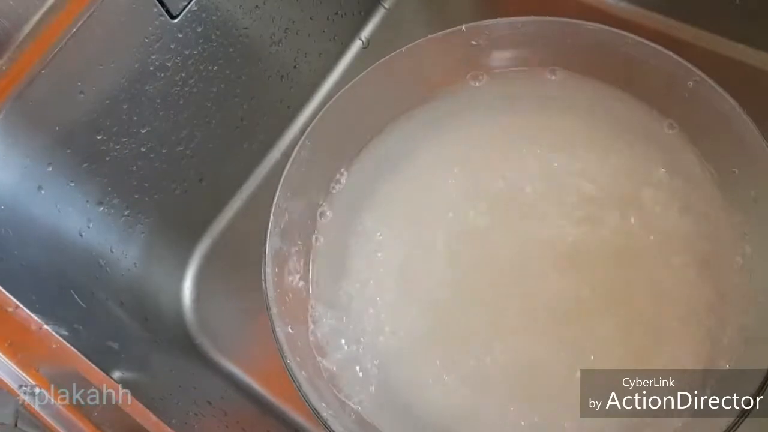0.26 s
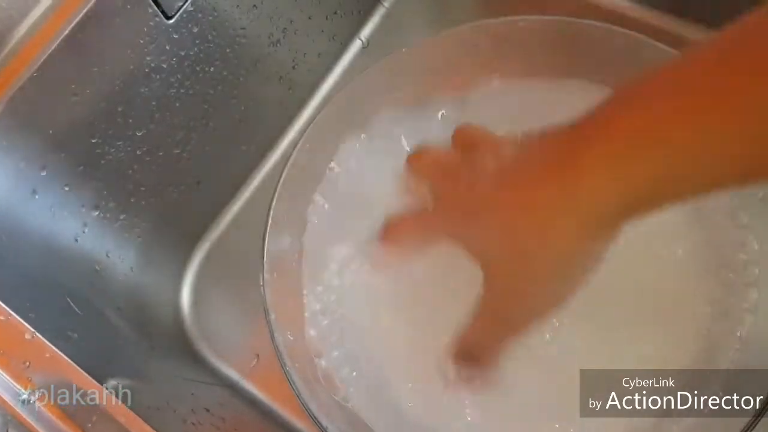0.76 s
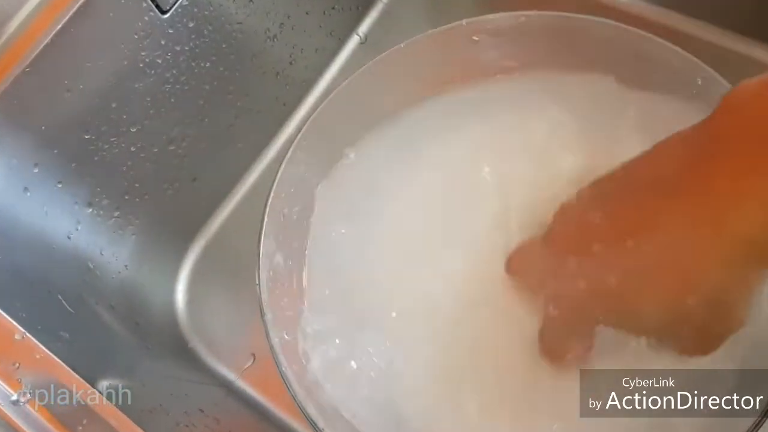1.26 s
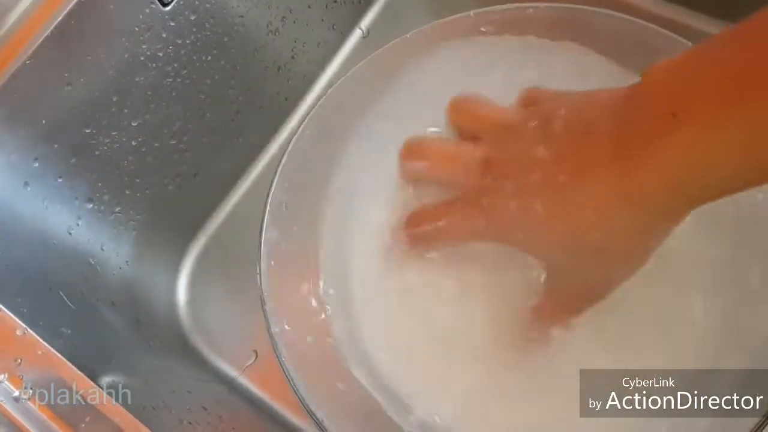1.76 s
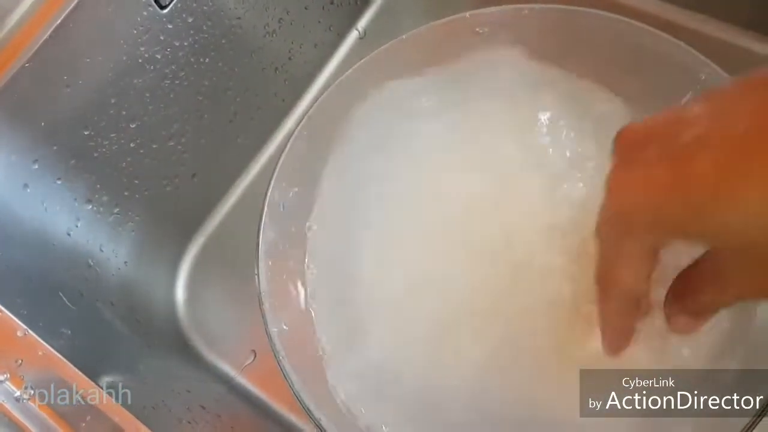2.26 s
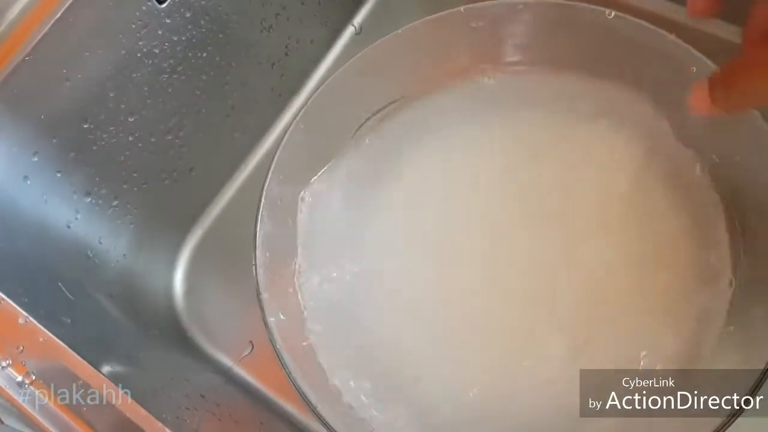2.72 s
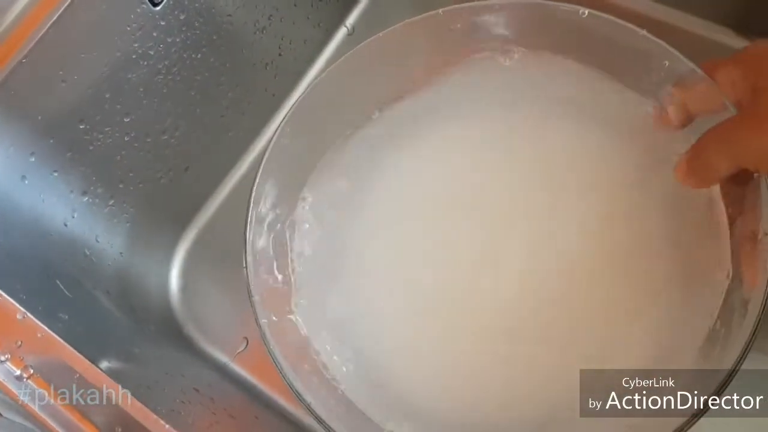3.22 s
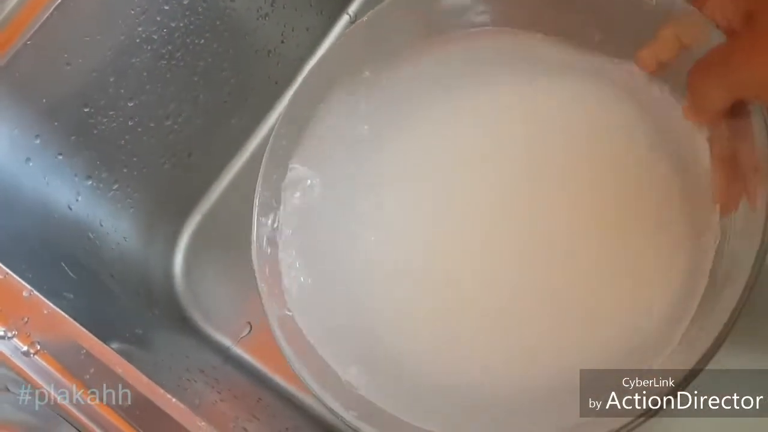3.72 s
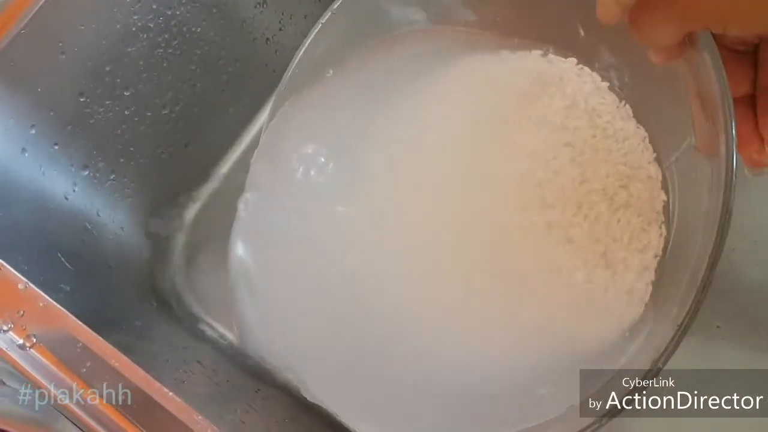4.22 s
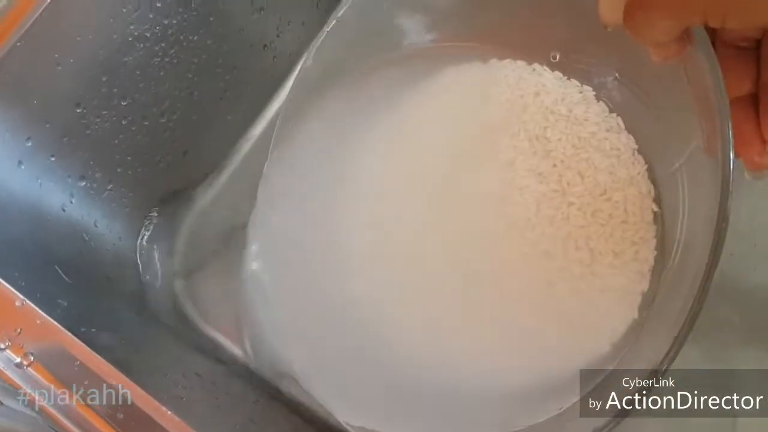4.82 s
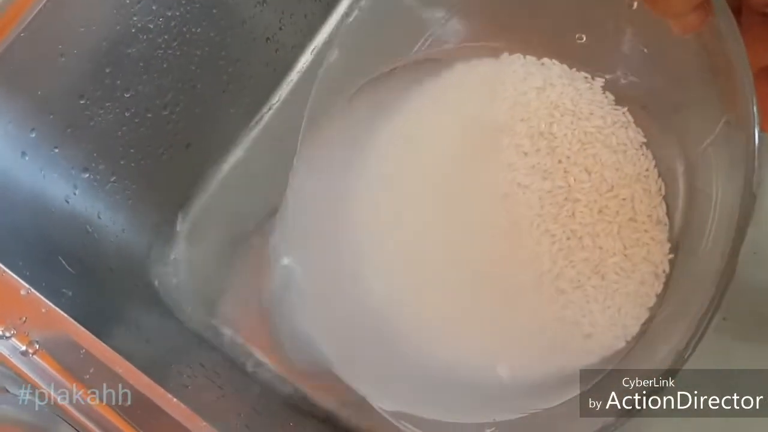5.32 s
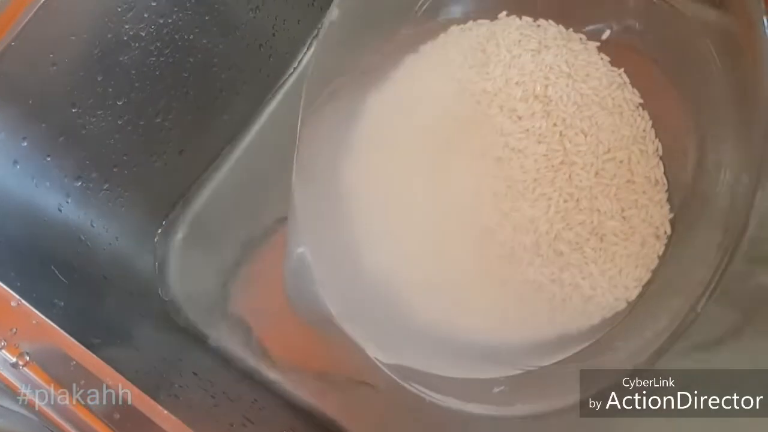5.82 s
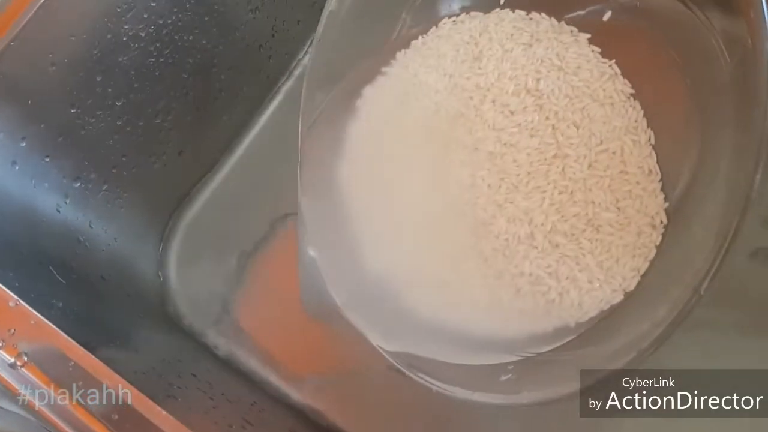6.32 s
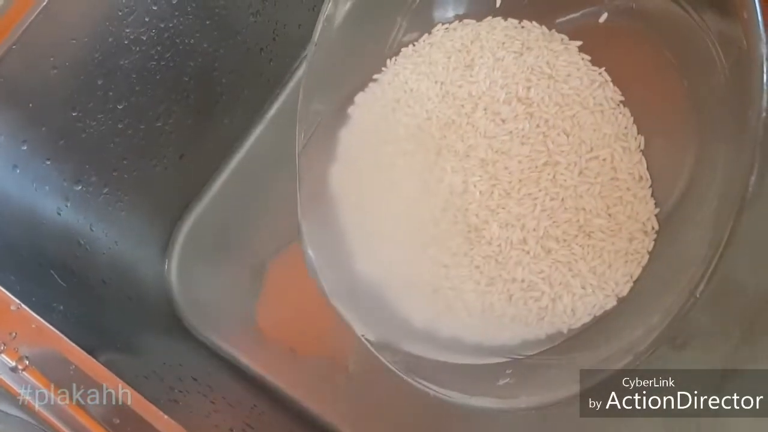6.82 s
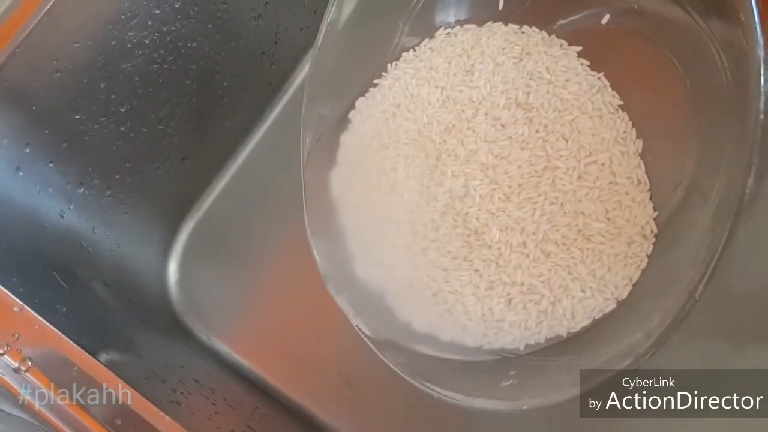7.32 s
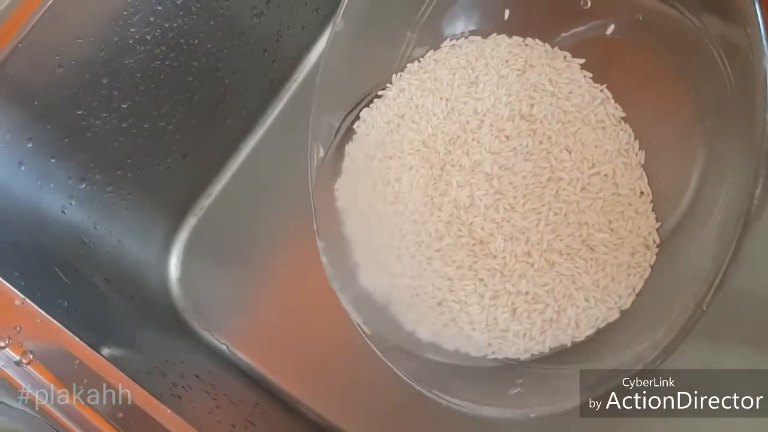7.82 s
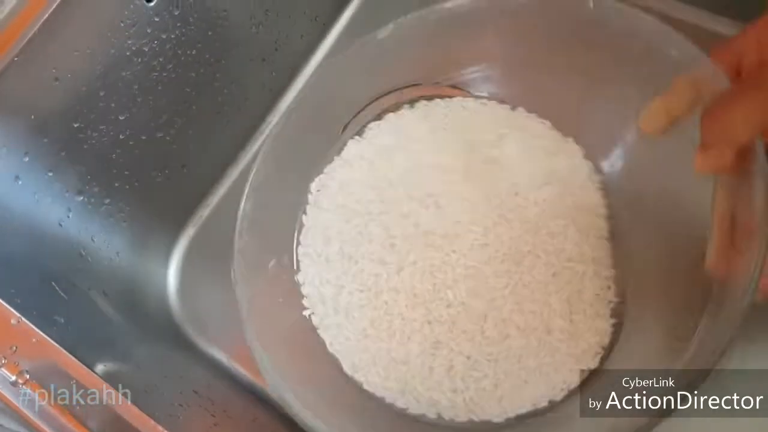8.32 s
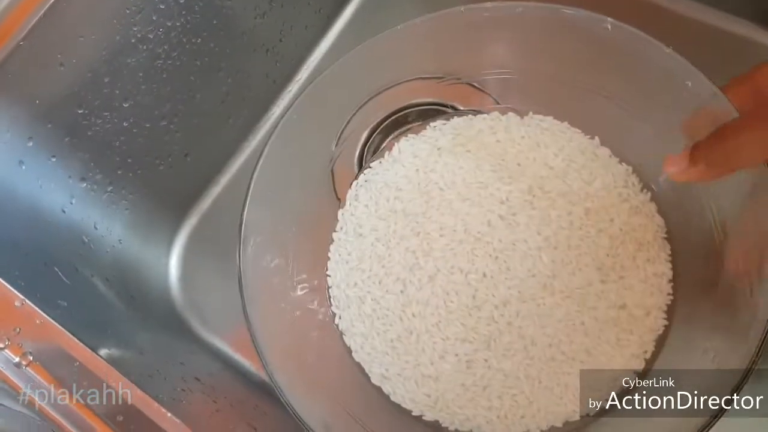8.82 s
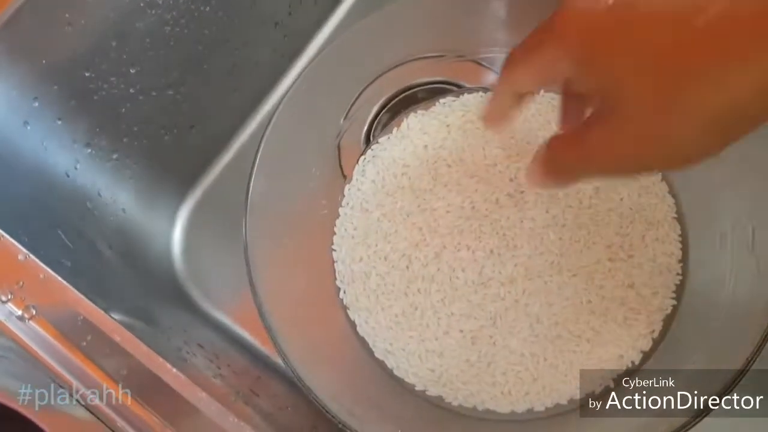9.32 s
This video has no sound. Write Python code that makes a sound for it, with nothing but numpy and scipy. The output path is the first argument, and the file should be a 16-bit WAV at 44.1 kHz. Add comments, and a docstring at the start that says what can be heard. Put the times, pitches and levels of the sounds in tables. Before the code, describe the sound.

Close stereo sound at a kitchen sink: tap water cuts off, then rice and water are swished very gently by hand, with low muffled thuds of steel. Midway, cloudy water is poured out, splashing brightly and then trickling with deep glugs from the drain. The glass bowl lands with a loud hollow thump, bounces and rattles, and settles into small wet sounds over faint room hum.

```python
"""The last of the tap splashes into a glass bowl of rice, then a hand stirs softly in a steel sink.
The bowl is tipped: water splashes on the steel and gurgles down the drain; a thump and bounces follow.
Water is made of random bubbles and noise, drops of short notes with hiss, steel and glass of fading
sines. The sink bottom drones and a quiet kitchen hums behind, all heard by a close two-port microphone."""
import sys
import numpy as np
from scipy import signal
from scipy.fft import rfft, irfft, next_fast_len
from scipy.io import wavfile
from scipy.ndimage import uniform_filter1d, map_coordinates

SR = 44100
rng = np.random.default_rng(int(sys.argv[2]) if len(sys.argv) > 2 else 0)


def wrap_up_sound(samples):
    """Save the sound to the file named by the first command line argument, as 16-bit audio."""
    columns = np.atleast_2d(samples).T
    # keep every value between -1 and 1, then stretch to whole-number steps
    tamed = np.clip(columns, -1, 1)
    steps = np.round(tamed * 32767).astype(np.int16)
    wavfile.write(sys.argv[1], SR, steps)


N = 421596
TIME = np.arange(N) / SR  # s

# Last of the tap, foam settling, then the pour: [t/s, slosh level/dB, trickle level/dB, fizz level/dB]
WATER_FLOW = [(0, -37, -38.5, -38.5), (.12, -59, -50, -45), (.17, -57, -52, -56), (.2, -68, -63, -52.5),
              (.35, -78.5, -90, -53), (.85, -72.5, -71, -56), (1.05, -76.5, -75, -61.5),
              (3.1, -83, -80, -68), (3.45, -79, -97, -72.5), (4.12, -80, -83, -71), (4.18, -59.5, -65, -59),
              (4.46, -57.5, -52.5, -50), (4.63, -45.5, -39, -38.5), (4.8, -47.5, -38.5, -43),
              (5.08, -56, -47, -48.5), (5.22, -47, -48.5, -44), (5.44, -58, -49.5, -56),
              (6.17, -61.5, -51, -54.5), (6.4, -55, -54.5, -60), (6.9, -61.5, -52.5, -59.5),
              (7.08, -53, -51, -54.5), (7.36, -67, -56.5, -60), (8.05, -61.5, -55, -60),
              (8.78, -56, -62.5, -74), (9.05, -71, -75.5, -76), (9.56, -64.5, -98, -103)]
# The hand sweeps through, the water sways:
# [peak t/s, length/s, slosh level/dB, trickle level/dB, fizz level/dB]
HAND_SWEEPS = [(.62, 0.45, -79, -74, -54.5), (.96, 0.16, -67.5, -68, -74), (1.56, 0.18, -90, -57.5, -64),
               (1.82, .12, -62, -64, -65), (2.1, 0.13, -77, -62.5, -79), (2.25, 0.18, -84, -72, -61),
               (2.47, 0.21, -75, -65, -62), (2.75, 0.092, -63, -79, -69), (2.99, 0.14, -62.5, -81, -78),
               (3.23, 0.094, -54, -59.5, -61), (3.69, 0.22, -55, -61.5, -58),
               (3.85, 0.16, -54.5, -61.5, -60.5), (9.53, 0.28, -71, -63, -57)]
# Tone colour of the low, middle and high water noise: [f/Hz, level/dB]
SLOSH_COLOUR = [(150, -45), (250, -3), (307, 3), (563, 0.5), (645, -6), (1100, -9), (1430, -19.5),
                (2420, -120)]
TRICKLE_COLOUR = [(470, -37), (800, -6.5), (1010, -18), (1090, -6.5), (1340, -3.5), (1560, -5.5),
                  (2430, -4.5), (4200, -13.5), (5460, -53), (9240, -120)]
FIZZ_COLOUR = [(2060, -15.5), (3500, -5.5), (5050, -1), (7300, -2), (8040, 2.5), (11900, -3.5), (15000, -1),
               (15800, -20.5), (16300, -38)]
TAP_OFF_S, POUR_S, POUR_END_S = 0.25, 4.15, 8.07
SLAPS_FALLING, SLAPS_STIRRED = .95, .25  # share of the flow that comes in slaps


def water():
    """Three sizes of bubble lie on noise; falling water breaks into slaps, stirred water hisses more evenly."""
    slosh_gain, trickle_gain, fizz_gain = swells(HAND_SWEEPS, curves(WATER_FLOW))
    falling = (TIME < TAP_OFF_S) | ((TIME > POUR_S) & (TIME < POUR_END_S))
    broken = uniform_filter1d(np.where(falling, SLAPS_FALLING, SLAPS_STIRRED), size=SR // 16)
    shared = spurts(rate=20, t60=0.048, spread_db=0.0)

    def flow(even, own):
        """Mixes an even stream with slaps, some shared by all layers and some of its own."""
        return 1 - broken + broken * unit(even + .6 * shared + own)

    def deep(hz):
        """Share of large cavities, which are struck at other moments than small ones."""
        return 1 / (1 + (hz / 2000) ** 4)

    large = flow(.4, spurts(rate=22, t60=0.13, spread_db=4.0)) * pair(TRICKLE_COLOUR)
    small = flow(0.12, spurts(rate=27, t60=0.06, spread_db=8.0)) * pair(TRICKLE_COLOUR)
    bed = filtered(large, lambda hz: np.sqrt(deep(hz)))
    bed += filtered(small, lambda hz: np.sqrt(1 - deep(hz)))

    slosh = 0.69 * broken * bubbles(
        count=900, centre_hz=515, octaves=.5, cycles=17.4, spread_db=7, size=2400)
    slosh += 0.76 * flow(0.16, spurts(rate=28, t60=0.03, spread_db=3.5)) * pair(SLOSH_COLOUR)
    trickle = .7 * broken * bubbles(
        count=2400, centre_hz=1918, octaves=0.719, cycles=36.5, spread_db=9.0, size=1500)
    trickle += .72 * bed
    fizz = 0.57 * broken * bubbles(
        count=3500, centre_hz=8520, octaves=.65, cycles=48, spread_db=4.5, size=600)
    fizz += 0.67 * flow(0.44, spurts(rate=48, t60=0.1, spread_db=7)) * pair(FIZZ_COLOUR)
    return slosh_gain * slosh + trickle_gain * trickle + fizz_gain * fizz


# Drops and splashes: [t/s, level/dB, bubble f/Hz, spray f/Hz, spray level/dB, left-right level/dB]
DROPS = [(.0516, -26, 1330, 4270, -13, 3), (0.069, -23.5, 1430, 4500, -1.5, 1),
         (0.0992, -24, 1524, 4440, 5, -2), (.117, -26, 1000, 1500, -9, 3),
         (0.15, -32.5, 1620, 2200, -16, -14), (.166, -33, 3270, 1600, -9, 3),
         (.2015, -59, 6160, 12700, 16, -11), (0.227, -44, 2060, 2050, -20, 10),
         (0.9327, -46.5, 2130, 4190, -4, 17), (1.2747, -48.5, 3910, 4140, 7, 3),
         (1.469, -29, 4950, 4970, -10, -3), (1.713, -47.5, 3050, 1910, -3, -15),
         (1.7574, -51, 6500, 11400, 7, -2.5), (1.809, -47, 1700, 3850, 2, 0),
         (1.827, -43.5, 1580, 8390, -21, -3), (2.2592, -41, 7130, 7350, -8, -3),
         (2.361, -41.5, 7100, 7700, 0.5, -10.5), (2.43, -44, 7640, 7730, -20, -19.5),
         (2.448, -40, 1395, 8100, -0.5, 12), (4.155, -49, 1100, 11200, 5, 0),
         (4.2297, -29.5, 2100, 6000, 1, -1), (4.3197, -33.5, 2480, 9800, -2, 1),
         (4.3426, -35, 4930, 4730, 7.5, -3), (4.4306, -16, 2550, 2970, 1.5, -7.5),
         (4.4712, -36, 2940, 2990, -22, -23), (4.483, -24, 1380, 2800, -21, 2),
         (4.511, -36, 1640, 2690, -15, 2), (4.525, -34, 2480, 4080, -18, -19),
         (4.5983, -22.5, 1360, 3520, -7, -9), (4.6198, -19, 1210, 2790, -19, 7),
         (4.643, -25, 1330, 3000, 3, 4), (4.66, -20.5, 1170, 2800, -10, 2),
         (4.6871, -16, 1324, 2820, -13, 2), (4.7753, -23, 1210, 2830, -19, 8),
         (4.8254, -19.5, 2140, 3100, -0.5, -3.5), (4.849, -18.5, 2420, 4500, -5, 3),
         (4.8958, -29.5, 1200, 6500, 9.5, -5), (4.945, -26, 2006, 4170, -1, 4),
         (5.035, -28, 1250, 2980, 0, 18), (5.118, -28.5, 1340, 5730, -28, 0),
         (5.1349, -28.5, 5040, 4540, 9, 0), (5.184, -30.5, 4450, 4520, -1, 6),
         (5.216, -25, 1680, 3140, -14, 1), (5.231, -30.5, 8640, 8700, 2, -12),
         (5.2777, -38, 2490, 4700, 6, -2), (5.501, -39, 1280, 11800, 4, 1),
         (5.532, -37, 3460, 3480, -10, -13), (5.618, -28.5, 1290, 2700, -12, -2),
         (5.6405, -27, 1810, 2650, 2, -.5), (5.704, -36, 1360, 2830, -23, 5),
         (5.7483, -33.5, 1180, 5040, -7, 4), (5.9022, -41, 2690, 2620, -29, -27),
         (6.0202, -39, 970, 3850, -15, 4), (6.055, -33, 1026, 2600, -8, 3),
         (6.107, -34.5, 2690, 2700, 1, -2), (6.141, -37.5, 1320, 8040, 5, -5),
         (6.2053, -32, 8940, 9740, -20, 2), (6.5618, -24.5, 936, 2640, -8, 1),
         (6.614, -36.5, 1030, 2500, -16, 3), (6.663, -37, 880, 3340, -25, -1),
         (6.68, -31, 844, 3300, -20, 2), (6.7497, -34.5, 2360, 2610, -19, 1),
         (6.9124, -38, 1020, 12100, -0.5, -.5), (6.992, -30, 1260, 2800, -7, 11),
         (7.062, -28, 3550, 3720, -1, 2), (7.21, -33, 1210, 3600, -24, 4),
         (7.538, -40, 5570, 5590, -25, -10), (7.7366, -32, 1820, 3300, -18, -4),
         (8.796, -43, 1490, 2760, -25, -8), (8.9288, -40.5, 1220, 4470, -4.5, 3),
         (9.039, -53.5, 1390, 8700, 2, -3), (9.128, -53, 1200, 2500, -15, 2),
         (9.4701, -36, 8040, 8160, -24, -12)]
# Large air pockets in bowl and drain: [t/s, level/dB, f/Hz]
AIR_POCKETS = [(.097, -30.5, 850), (3.763, -38, 220), (4.151, -38.5, 353), (4.481, -36, 485),
               (4.614, -29.5, 780), (4.665, -28, 407), (4.775, -31.5, 453), (4.838, -36, 430),
               (4.903, -33, 740), (4.941, -28.5, 793), (5.193, -31, 730), (5.594, -23, 160),
               (5.632, -25, 199), (5.702, -29, 197), (6.341, -26.5, 540), (6.371, -30, 547),
               (6.397, -31, 547), (6.428, -42, 544), (6.475, -30, 220), (6.659, -30.5, 207),
               (6.772, -26.5, 176), (6.829, -29.5, 166), (6.927, -38, 253), (7.109, -24.5, 213),
               (7.222, -27.5, 208), (7.27, -30.5, 163), (7.387, -31, 217), (7.467, -25, 160),
               (7.606, -33, 171), (7.732, -30, 187), (7.868, -20, 158), (7.915, -26, 167)]
DRIBBLE_S, DRIBBLE_DB, DRIBBLE_HZ = 4.8, -50.5, 1890  # start, middle level and pitch of random small drops
GULP_T60_S, GULP_SMALL_HZ = 0.077, 900  # ring of a very large pocket; halved at this pitch


def splashes():
    """Each drop snaps, throws spray and leaves a short rough note; larger air pockets gulp."""
    out, t = np.zeros((2, N)), TIME[:SR // 6]

    def band(hz, width, x):
        """Keeps the sound around one pitch."""
        edges = [hz / width, min(hz * width, 20000)]
        return signal.lfilter(*signal.butter(1, edges, "band", fs=SR), x)

    fade = amp(-60 * t / 0.031) * (1 - np.exp(-t / 0.0009))
    dribble = [(rng.uniform(DRIBBLE_S, POUR_END_S), DRIBBLE_DB + 1.8 * a, DRIBBLE_HZ * 2 ** (.4 * b),
                3300 * 2 ** (0.59 * c), -4 + 5 * d, 8 * e)
               for a, b, c, d, e in rng.standard_normal((30, 5))]
    for s, db, hz, spray_hz, spray_db, pan in DROPS + dribble:
        hiss = rng.standard_normal((3, len(t)))
        snap = 0.62 * band(hz, 1.65, hiss[0])
        mist = band(10000 * 2 ** rng.uniform(-0.076, 0.42), 1.03, hiss[2])
        spray = amp(spray_db) * (1.6 * band(spray_hz, 1.12, hiss[1]) + 0.32 * mist)
        rough = 1 + 0.26 * np.cos(2 * np.pi * hz * rng.uniform(0.035, .12) * t)
        note = bubble(hz, 0.031, 0.023, len(t), 0.8) * rough
        gain = amp(db + np.array([[pan / 2], [-pan / 2]]))
        add(out, s, gain * (0.72 * note + fade * (snap + spray)))
    for s, db, hz in AIR_POCKETS:
        t60 = GULP_T60_S / (1 + hz / GULP_SMALL_HZ)
        add(out, s, amp(db) * bubble(hz, t60, 0.063, len(t), 1.0)[None])
    return out


# The bowl is set down and bounces: [t/s, level/dB, boom level/dB, clatter level/dB, crack level/dB, rattle t60/s]
KNOCKS = [(8.076, -1, -10.5, -24.5, -48, 0.19), (8.117, -12.5, -21, -12, -16.5, 0.23),
          (8.255, -11.5, -7.5, -16.5, -44, 0.18), (8.329, -18.5, -19, -19.5, -41, 0.6),
          (8.399, -28.5, -17, -14.5, -33, 1), (8.533, -14.5, -16, -14, -39, 0.076),
          (8.6525, -25, -14, 7, 8, 0.26), (8.688, -23, -11, -18, -34, 0.17)]
# Tones of the sink bottom: [f/Hz, level/dB, t60/s]
SINK_TONES = [(53.6, 6, 0.27), (111.4, 2.5, 0.12), (135.3, -4.5, 0.14), (179.8, -13, 0.3),
              (238, -5.5, 0.084), (329, -13, 0.1), (472, -14.5, 0.091), (612, -16.5, 0.062),
              (715, -9.5, 0.04)]


def thumps():
    """The bowl's foot drives the sink bottom down; rice and drain plate clatter and rattle on."""
    out, t = np.zeros((2, N)), TIME[:SR // 2]
    low = signal.butter(1, [60, 450], "band", fs=SR)
    mid = signal.butter(1, [400, 1500], "band", fs=SR)
    high = signal.butter(2, 2500, "high", fs=SR)
    for s, db, boom_db, clatter_db, crack_db, rattle in KNOCKS:
        level_db = np.array([g for _, g, _ in SINK_TONES]) + rng.normal(0, 1, len(SINK_TONES))
        level_db[0] += boom_db  # only the lowest tone booms
        ring = sum(amp(g - 60 * t / t60) * -np.sin(2 * np.pi * hz * t)
                   for (hz, _, t60), g in zip(SINK_TONES, level_db))
        # one noise shared by both ears, plus a louder one for each
        hiss = rng.standard_normal(len(t)) + 2.35 * rng.standard_normal((2, len(t)))
        tail = amp(-60 * t / rattle)
        shudder = signal.lfilter(*low, rng.standard_normal(len(t)) + .04 * hiss)
        shudder = 0.35 * amp(-60 * t / (1.46 * rattle)) * shudder
        clatter_fade = amp(-60 * t / 0.053) + 0.24 * tail
        clatter = amp(clatter_db + 0.5) * clatter_fade * signal.lfilter(*mid, hiss)
        crack_fade = amp(-60 * t / 0.037) + 0.059 * tail
        crack = amp(crack_db - 8.5) * crack_fade * signal.lfilter(*high, hiss)
        onset = 1 - np.exp(-t / 0.0032)
        add(out, s, amp(db) * ((1.03 * ring + shudder) * onset + clatter + crack))
    return out


# Tones of the glass bowl: [f/Hz, level/dB, t60/s]
GLASS_TONES = [(443, -2, 0.65), (1000, -12.5, 0.72), (1809, -6, 0.54), (2750, 19, 0.32), (3850, -4, .15),
               (5100, 0, 0.11)]
# A knuckle on the bowl: [t/s, level/dB]
KNUCKLE = [(.582, -49)]
# Single glassy notes: [t/s, level/dB, f/Hz, t60/s]
LONE_NOTES = [(2.442, -39.5, 1336, 0.19), (2.453, -52, 1760, .4), (8.122, -21.5, 2143, 0.27),
              (8.872, -60.5, 1850, 0.48), (9.47, -52.5, 1860, 0.78)]


def bowl():
    """A knock rings all the glass tones as fading sines; a few lone notes ring too."""
    out, t = np.zeros((2, N)), TIME[:SR // 2]
    knock = [(s, db + g, hz, t60) for s, db in KNUCKLE for hz, g, t60 in GLASS_TONES]
    for s, db, hz, t60 in knock + LONE_NOTES:
        onset = 1 - np.exp(-t / 0.0099)
        add(out, s, amp(db - 60 * t / t60)[None] * np.sin(2 * np.pi * hz * t) * onset)
    return out


# The load shifts on the steel under hand and bowl: [peak t/s, length/s, boom level/dB, drum level/dB]
LOAD_SHIFTS = [(.01, 0.067, -26.5, -40), (0.194, 0.18, -43, -62), (0.648, 0.12, -31, -51.5),
               (1.024, 0.2, -39, -57.5), (1.3, .15, -65, -64), (1.734, 0.082, -39.5, -66),
               (1.83, 0.23, -47, -57), (2.02, 0.12, -42, -58), (2.372, 0.13, -44, -64),
               (2.707, 0.12, -42.5, -64), (2.954, 0.11, -44.5, -49.5), (3.092, 0.29, -50.5, -54),
               (3.32, 0.12, -42.5, -51.5), (3.764, 0.22, -31, -40), (3.864, 0.15, -58, -41),
               (4.044, 0.11, -52, -52), (9.485, 0.36, -44, -52)]
# Ongoing shaking of the steel, mostly by running water: [t/s, boom level/dB, drum level/dB]
SHAKING = [(0, -82, -67.5), (4.1, -86, -67.5), (4.46, -56, -54), (4.76, -51, -45.5), (5.24, -50, -46.5),
           (5.5, -56, -53), (6.16, -52, -53), (6.5, -60, -48.5), (7.07, -57, -48), (7.45, -81, -45.5),
           (8.05, -62, -47.5), (8.78, -51, -48), (9.099, -78, -55), (9.56, -59, -63)]
# Lowest and next resonances of the sink bottom, before the filter is squared: [f/Hz, width/Hz, level/dB]
BOOM_PEAKS = [(55.4, 9.5, 0), (83.8, 22.6, -8.5)]
DRUM_PEAKS = [(113, 33, 4.5), (146.7, 29, 0.5), (199.3, 56, -2), (236, 140, -21.5)]


def steel_drone():
    """Shifting weight and running water shake the sink bottom in its lowest resonances, in lumps."""
    out = 0
    gains = swells(LOAD_SHIFTS, curves(SHAKING))
    for gain, peaks, lumps_db in zip(gains, (BOOM_PEAKS, DRUM_PEAKS), (2.5, 3.5)):
        def ring(f):
            """Resonance filter, squared so that it acts twice."""
            return sum(amp(g) * 1j * f * w / (c * c - f * f + 1j * f * w) for c, w, g in peaks) ** 2
        lumpy = amp(lumps_db * wobble(25)) * rng.standard_normal(N)
        out = out + gain * unit(filtered(lumpy, ring))
    return out * amp([[.3], [-.3]])  # a touch louder on the left


# Echo of the steel walls: [f/Hz, t60/s]
WALL_ECHO = [(100, 0.53), (1000, 0.14), (5000, 0.095), (15000, 0.018)]


def basin(x):
    """The steel walls answer with a noise tail above 200 Hz; each frequency dies at its own speed."""
    hz, t, z = signal.stft(rng.standard_normal((2, SR // 3)), SR, nperseg=256)
    fade = amp(-60 * t / along(WALL_ECHO, hz)[:, None])
    tail = signal.istft(z * fade * (hz[:, None] > 200), SR, nperseg=256)[1]
    return signal.fftconvolve(x.mean(0)[None], tail / np.linalg.norm(tail[0]), axes=1)[:, :N]


# Tone colour of room air and microphone hiss: [f/Hz, level/dB]
ROOM_COLOUR = [(15, -32), (25, 7.5), (74, 7), (150, -6.5), (258, -21), (377, -8.5), (805, -82.5),
               (922, -18.5), (1310, -43), (2580, -25.5), (4100, -72.5), (4950, -63), (14700, -28),
               (16300, -47)]
# Appliance hum, before its lift and wavering: [f/Hz, level/dB]
HUM_TONES = [(145.3, -67), (960, -87.5)]
KITCHEN_DB = -58


def kitchen():
    """Room air and microphone hiss are coloured noise; a faint appliance hum wavers in level and pitch."""
    hum = 0
    for hz, db in HUM_TONES:
        level = amp(db + 5.5 + 2.5 * wobble(14.0))
        hum = hum + level * np.sin(2 * np.pi * hz * TIME + hz / 350 * wobble(15))
    return amp(KITCHEN_DB) * pair(ROOM_COLOUR) + hum


def bubble(hz, t60, rise, size, swell):
    """A damped sine that swells over some cycles; its pitch climbs as the bubble nears the surface."""
    t = np.arange(size) / SR
    envelope = amp(-60 * t / t60) * (1 - np.exp(-t * hz / swell))
    return envelope * np.sin(2 * np.pi * hz * t * (1 + rise * t / t60))


def bubbles(count, centre_hz, octaves, cycles, spread_db, size):
    """A random stream of bubbles, rms 1, each at its own place between the ports."""
    when = rng.random(count)
    pitch, big, pan = rng.standard_normal((3, count))
    hz = np.clip(centre_hz * 2 ** (octaves * pitch), 60, 15000)[:, None]
    rows = bubble(hz, cycles / hz, 0.054, size, 3.9) * amp(spread_db * np.abs(big))[:, None]
    where = ((when * N).astype(int)[:, None] + np.arange(size)).ravel()
    sides = [np.bincount(where, (rows * amp(side * 7.0 * pan)[:, None]).ravel(), N + size)[:N]
             for side in (1, -1)]
    return unit(np.array(sides))


def spurts(rate, t60, spread_db):
    """Flow that arrives in slaps: rises of a few ms at random moments, each dying away."""
    size_db = spread_db * rng.standard_normal(N)
    hits = (rng.random(N) < rate / SR) * amp(size_db)  # rate is slaps a second
    slaps = signal.lfilter([1], [1, -amp(-60 / (t60 * SR))], hits)
    return uniform_filter1d(slaps, size=150)


RISE_DB, FALL_DB = 21.5, 17.5  # below the peak, one length before and after it


def swells(rows, steady_db):
    """Adds passing swells to an ongoing level, giving one gain curve for each level column."""
    s, length, *peaks = np.transpose(rows)[:, :, None]
    coarse = TIME[::64]
    late = (coarse - s) / length
    shape_db = np.where(late < 0, RISE_DB * late, -FALL_DB * late)
    gains = []
    for peak, db in zip(peaks, steady_db):
        events = np.sqrt(np.sum(amp(2 * (peak + shape_db)), 0))
        gains.append(np.hypot(amp(db), np.interp(TIME, coarse, events)))
    return gains


# How alike left and right are: [f/Hz, likeness from 0 to 1]
LIKENESS = [(60, 0.93), (200, 0.43), (500, 1), (1500, 0.2), (6000, 0.057), (15000, .4)]


def pair(spectrum):
    """Stereo noise of rms 1; how alike the two sides are depends on frequency."""
    def split(hz):
        """Shares the colour between middle and side."""
        turn = np.arccos(np.clip(along(LIKENESS, hz), 0, 1)) / 2
        return amp(along(spectrum, hz)) * [np.cos(turn), np.sin(turn)]
    mid, side = filtered(rng.standard_normal((2, N)), split)
    return unit(np.array([mid + side, mid - side]))


def amp(db):
    """dB to gain."""
    return 10 ** (np.asarray(db) / 20)


def unit(x):
    """Scaled to rms 1."""
    return x / np.sqrt(np.mean(x ** 2) + 1e-20)


def along(points, hz):
    """Reads between (Hz, value) points on a log axis."""
    f, v = np.transpose(points)
    return np.interp(np.log(hz + 1), np.log(f + 1), v)


def curves(rows):
    """One value per sample for each column after the time."""
    s, *cols = np.transpose(rows)
    return [np.interp(TIME, s, c) for c in cols]


def wobble(rate):
    """A smooth random curve, rate knots a second."""
    return map_coordinates(rng.standard_normal(int(N * rate / SR) + 4), [TIME * rate])


def filtered(x, response):
    """x times a complex response of frequency."""
    m = next_fast_len(N + SR // 2)
    return irfft(rfft(x, m) * response(np.fft.rfftfreq(m, 1 / SR)), m)[..., :N]


def add(track, s, sound):
    """Mixes a sound into a stereo track from time s."""
    part = track[:, round(s * SR):][:, :sound.shape[-1]]
    part += sound[..., :part.shape[1]]


LEAD_S = 8 / 44100  # the left port is nearer


def scene():
    """Everything in the sink reaches the left port first; the kitchen lies behind."""
    hits, wet, knocks = splashes(), water(), thumps()
    sink = hits + wet + knocks + bowl() + steel_drone()
    sink += amp(-6.5) * basin(knocks) + amp(-4.5) * basin(hits) + amp(-2.5) * basin(wet)
    sides = np.array([[1], [-1]])  # half the lead on each side
    return filtered(sink, lambda hz: np.exp(1j * np.pi * hz * LEAD_S * sides)) + kitchen()


TOP_HZ = 16450  # nothing is kept from here up


def record(dry):
    """The capsules lose the deepest bass and the top; the right one is a little louder and brighter."""
    def response(hz):
        tilt = amp(along([(200, 0.3), (4000, 1.07), (15000, 1.1)], hz) * np.array([[-1], [1]]))
        bass = (1j * hz / (1j * hz + 36)) ** 3
        treble = amp(along([(9000, 0.5), (12000, 1.5), (15300, -1.0), (15800, -6.5), (16300, -42)], hz))
        return tilt * bass * treble * (hz < TOP_HZ)
    return filtered(dry, response)


dry = scene()
out = record(dry)
wrap_up_sound(out)
```